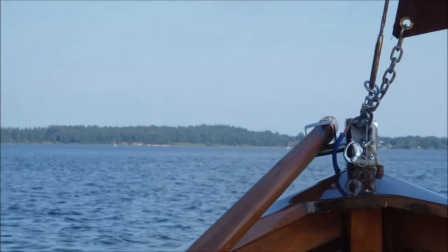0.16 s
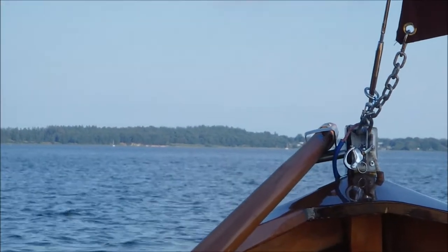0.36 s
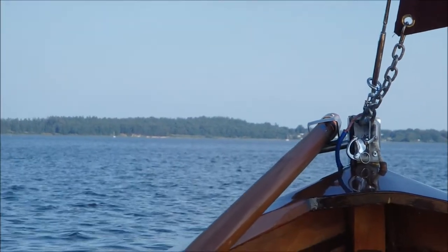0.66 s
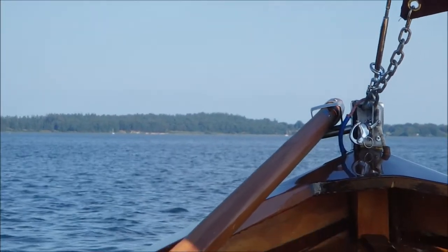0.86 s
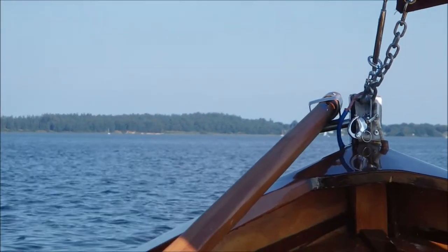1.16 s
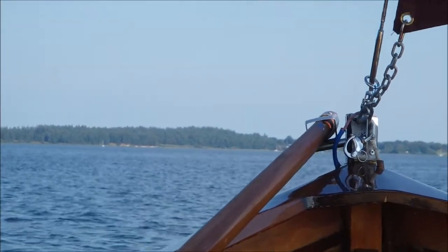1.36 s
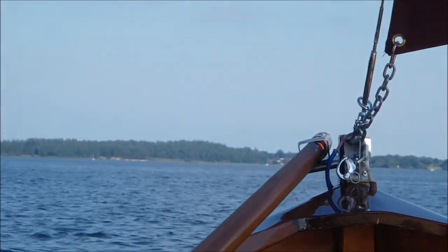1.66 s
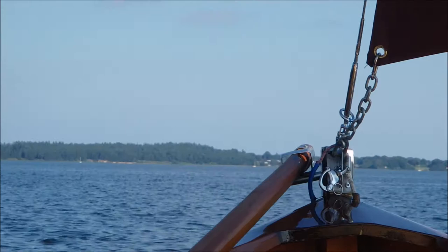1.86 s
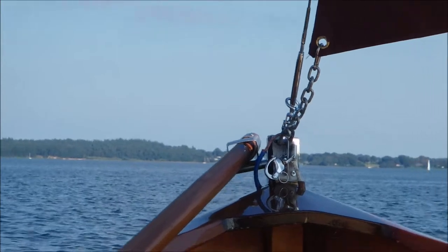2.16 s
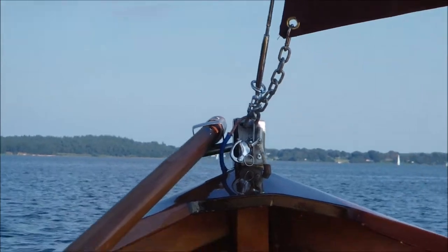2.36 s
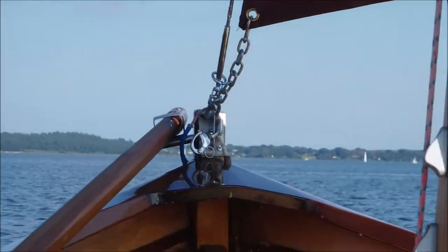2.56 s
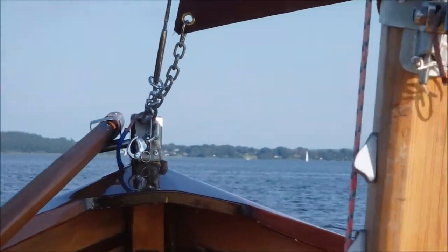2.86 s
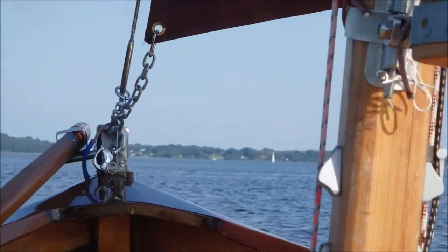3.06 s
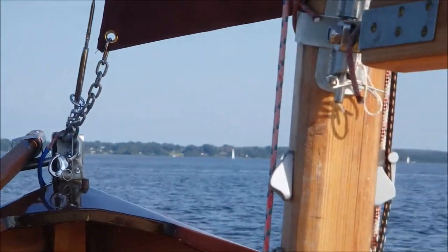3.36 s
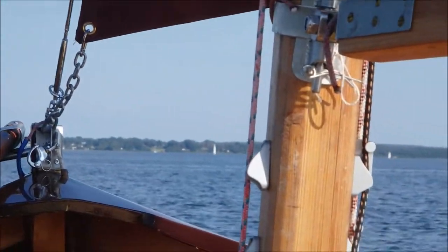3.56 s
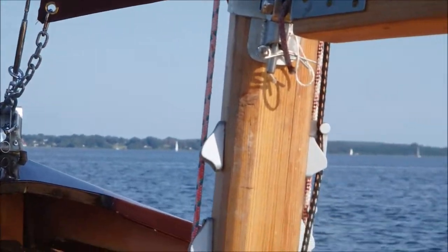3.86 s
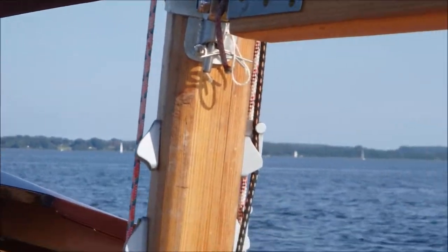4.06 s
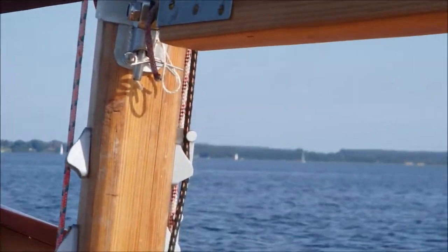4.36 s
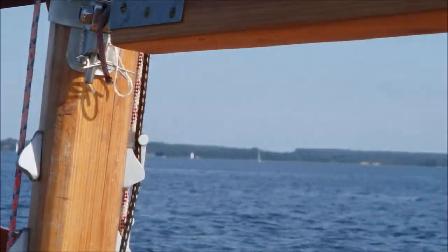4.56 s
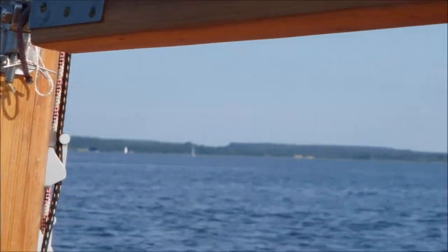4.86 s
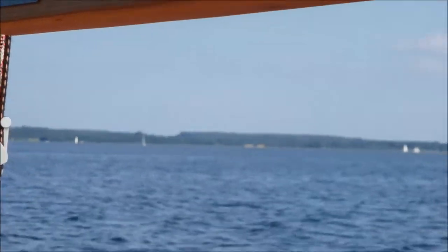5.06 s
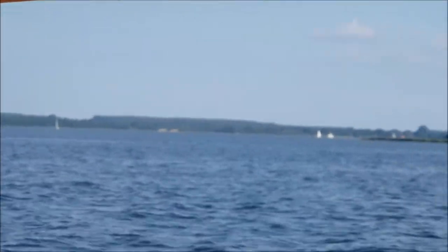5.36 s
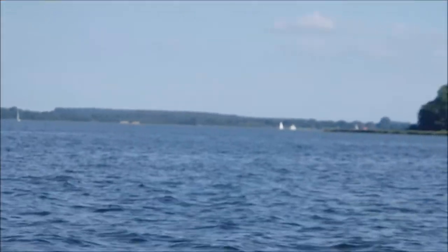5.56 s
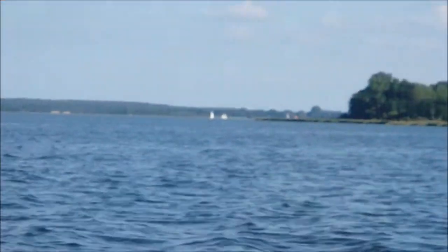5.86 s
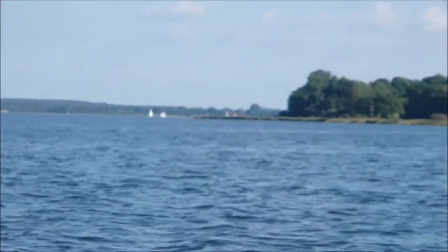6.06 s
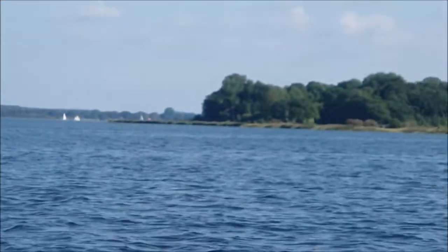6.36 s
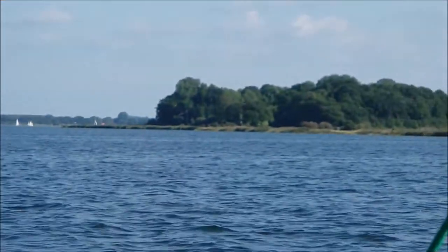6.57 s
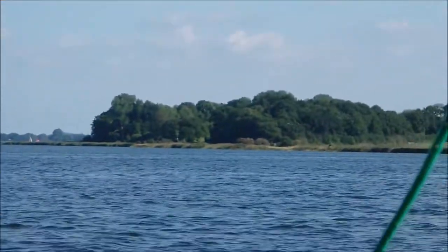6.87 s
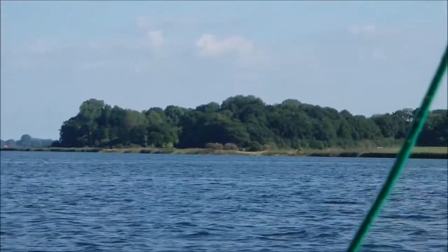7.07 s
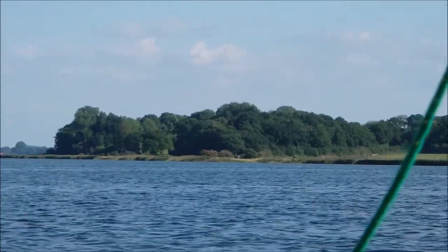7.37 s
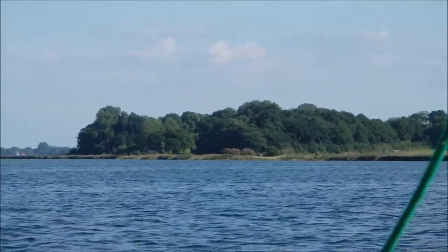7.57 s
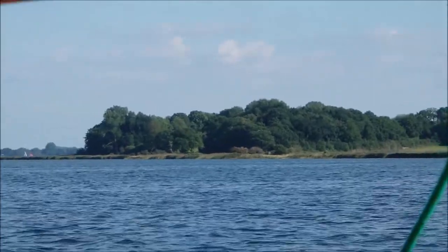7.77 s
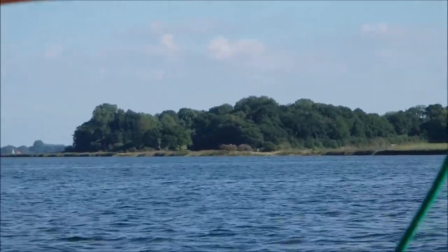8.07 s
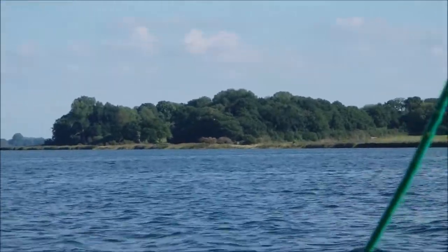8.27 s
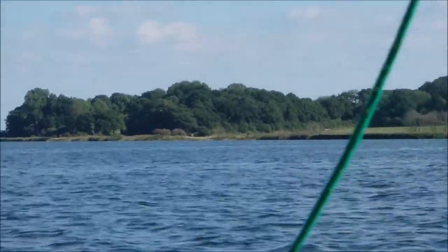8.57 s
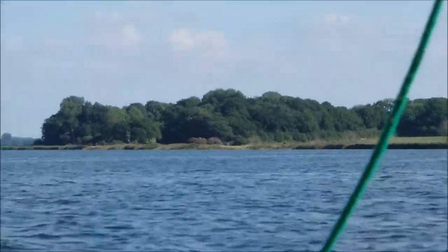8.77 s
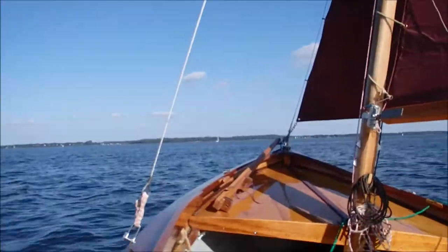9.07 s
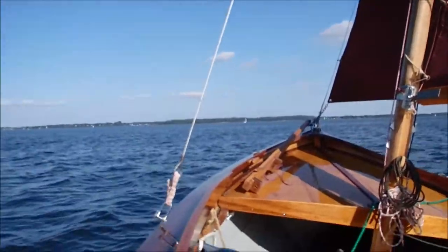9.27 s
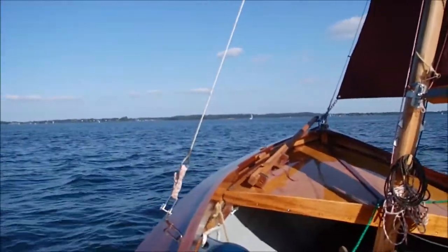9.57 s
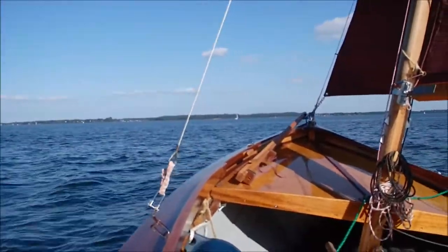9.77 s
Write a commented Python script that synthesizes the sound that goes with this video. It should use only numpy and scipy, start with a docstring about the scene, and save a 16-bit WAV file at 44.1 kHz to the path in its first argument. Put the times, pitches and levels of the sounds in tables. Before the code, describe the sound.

Water washes and fizzes along the wooden hull of a small sailing boat throughout, heard close from on board. Irregular slaps, bubbly glugs and ticking drops stand out, with the strongest splashes around 2.1, 6.5, 7.1 and 7.9 seconds. Bigger waves send dull thumps through the planks, for instance at 1.5, 4.8, 6.5, 7.9 and 9 seconds. Wind buffets the microphone with a low, uneven rumble, light at first, swelling briefly at 3.4 seconds and gusting harder from about 5.3 seconds, mostly toward the left. Between 8.3 and 8.5 seconds a finger creaks faintly on the camera casing. A sharp, loud button click at 8.8 seconds makes the level duck, and the sound drops out for an instant at 8.9 seconds. Water and wind then resume until the end at about 10 seconds.

```python
"""Wavelets slap, gurgle and thump along the wooden hull of a small sailing boat. Bubbles ring as
damped oscillators, drops strike the planks, and the churning water drives the planking's resonances.
Wind eddies buffet both microphone ports of a hand-held camera. Near the end a finger creaks on the
casing by stick-slip friction and clicks its button: the gain ducks, the sound stops for an instant,
and water and wind resume in a second shot."""
import sys
import numpy as np
from scipy import signal
from scipy.fft import rfft, irfft, next_fast_len
from scipy.io import wavfile
from scipy.ndimage import uniform_filter1d, map_coordinates

SR = 44100
rng = np.random.default_rng(int(sys.argv[2]) if len(sys.argv) > 2 else 0)


def materialize(psi):
    """Save the field psi as 16-bit PCM at rate SR to the path in sys.argv[1].

    A 1-D psi becomes a single channel; in a 2-D psi each row is a channel.
    """
    bounded = np.clip(np.atleast_2d(psi).T, -1, 1)
    quanta = np.round(bounded * 32767).astype(np.int16)
    wavfile.write(sys.argv[1], SR, quanta)


N = 437472

# Each row: time in seconds, level in dB, pitch in Hz, purity from 0 (slap) to 1 (glug).
GLUGS_AND_SLAPS = [(.112, -10, 544, 0.3), (.13, -15, 188, 0.9), (.186, -18.5, 1253, .6),
                   (0.594, -23.5, 965, 0.8), (.75, -16.5, 797, .47), (.801, -12.5, 590, 0.6),
                   (1.219, -22.5, 620, 0.64), (1.455, -17, 279, .7), (1.48, -13, 189, 0.64),
                   (1.495, -15, 652, 0.4), (2.082, -13.5, 1575, 0.35), (2.1, -14, 201, .5),
                   (2.155, -5.5, 962, 0.28), (2.294, -18.5, 1220, 0.13), (2.45, -13.5, 639, 0.61),
                   (2.69, -15.5, 717, 0.4), (2.872, -16.5, 980, 0.16), (2.926, -14, 1177, 0.38),
                   (3.022, -16, 645, 0.4), (3.121, -27, 900, 0.9), (3.151, -20, 630, 1),
                   (3.335, -15.5, 642, 0.84), (3.624, -18, 1630, 0.2), (3.82, -26, 954, 0.96),
                   (3.894, -22.5, 768, 0.8), (4.057, -16, 693, 0.84), (4.161, -24.5, 717, 0.25),
                   (4.268, -26, 1355, 0.8), (4.297, -16.5, 740, 0.76), (4.422, -14.5, 1343, 0.35),
                   (4.52, -26.5, 1000, .7), (5.028, -22.5, 1110, 1), (5.04, -19, 450, .6),
                   (5.158, -26, 1360, 0.54), (5.2, -23, 723, .7), (5.285, -21, 703, 0.6),
                   (5.58, -21, 672, 0.8), (5.859, -13.5, 424, 0.43), (5.93, -20.5, 710, 0.4),
                   (5.994, -25, 1500, 0.9), (6.415, -13, 447, 0.4), (6.51, -10, 705, 0.6),
                   (6.53, -11, 190, .5), (6.589, -7, 663, 0.35), (6.892, -23.5, 914, 1),
                   (7.002, -27, 1440, 0.8), (7.146, -8, 767, 0.36), (7.48, -18.5, 666, 0.3),
                   (7.64, -23, 630, 0.74), (7.736, -18.5, 964, 0.44), (7.818, -15.5, 938, .4),
                   (7.87, -17, 670, 0.65), (7.928, -11, 1105, 0.3), (8.411, -31, 1075, .35),
                   (8.445, -14, 936, 0.7), (8.546, -18, 490, 0.12), (8.754, -15, 1203, .26),
                   (8.947, -26, 590, 0.9), (9.015, -17.5, 488, 0.97), (9.41, -17.5, 393, 0.22),
                   (9.659, -16.5, 772, 0.43), (9.704, -11.5, 923, 0.16)]
def glugs_and_slaps(glug_t60_s=0.058, slap_t60_s=0.13):
    """Bubble resonance: a glug is one damped, rising tone; a slap is broad noise around that pitch."""
    out, t = np.zeros((2, N + SR)), np.arange(SR // 8) / SR
    for start, db, hz, purity in GLUGS_AND_SLAPS:
        t60 = purity * glug_t60_s + (1 - purity) * slap_t60_s
        envelope = amp(-60 * t / t60) * (1 - np.exp(-t / .006))
        tone = rising_tone(t, hz, climb=1.05, jitter=0.075)
        slap = band_noise(len(t), hz * 0.71, hz * 1.48)
        blend = purity * tone + 0.54 * (1 - purity) * slap
        add_at(out, start - .004, amp(db) * envelope / envelope.max() * blend)
    return out[:, :N]

# Each row: start in seconds, level in dB, centre frequency in Hz.
DROP_STRIKES = [(0.1103, -21, 2430), (.374, -17, 3570), (0.5896, -16, 2230), (0.8057, -13, 2590),
                (0.912, -21, 3080), (1.023, -19.5, 2170), (1.13, -33, 2000), (1.2504, -27, 3830),
                (1.342, -19, 3990), (1.445, -7, 2730), (1.768, -17, 9900), (1.942, -21, 3910),
                (2.084, -12.5, 2110), (2.1417, -10.5, 1760), (2.295, -23, 2500), (2.4335, -27, 4000),
                (2.6901, -13.5, 2920), (2.894, -20, 2680), (3.0826, -23, 3200), (3.146, -16.5, 2360),
                (3.517, -22, 2420), (3.5532, -18, 3650), (3.6214, -19, 1790), (3.7137, -16.5, 3180),
                (3.8584, -21.5, 2880), (4.3627, -14.5, 2910), (4.7736, -22, 3860), (4.842, -19, 3000),
                (4.8713, -19, 4050), (5.157, -17, 8500), (5.2826, -28, 1850), (5.3253, -21, 2920),
                (5.363, -13.5, 3780), (5.728, -19, 6000), (5.8045, -19, 2310), (6.0065, -11.5, 2490),
                (6.411, -14.5, 4130), (6.4907, -13.5, 3460), (6.593, -21, 3210), (6.615, -13, 2670),
                (6.6593, -28, 2420), (6.892, -29, 2020), (6.9162, -23.5, 2730), (6.944, -19.5, 4210),
                (7.0568, -16, 2320), (7.1372, -14, 1990), (7.623, -27, 3800), (7.8216, -22, 3200),
                (7.884, -20.5, 3860), (7.931, -22, 1900), (7.9886, -16, 2430), (8.284, -21, 3140)]
def drop_strikes(attack_s=0.00066, t60_s=0.057):
    """Impact excitation: drops and wave tips hit the planks, each a sudden burst with a short ring."""
    out, t = np.zeros((2, N + SR)), np.arange(SR // 8) / SR
    for start, db, hz in DROP_STRIKES:
        envelope = amp(-60 * t / t60_s) * (1 - np.exp(-t / attack_s))
        burst = band_noise(len(t), hz * 0.82, hz * 1.21)
        ring = rising_tone(t, hz, climb=1.68, jitter=0.1)
        add_at(out, start, amp(db) * envelope * (0.64 * ring + 0.68 * burst))
    return out[:, :N]

# Steady flow, one list per shot. Each row: time in seconds, gurgle level in dB, fizz level in dB.
WATER_FLOW = [
    [(0, -35, -37), (.35, -45, -38), (.6, -41, -36), (1.15, -43, -37), (1.85, -41.5, -42),
     (2.2, -36.5, -35), (2.6, -43, -32), (2.68, -51, -41.5), (2.75, -35, -30), (2.85, -37, -37),
     (3.08, -37.5, -37), (3.28, -33.5, -31.5), (3.94, -43, -41.5), (4.4, -36, -37.5), (4.6, -44.5, -43),
     (5.18, -38.5, -34.5), (6.25, -45.5, -39.5), (6.55, -34, -36), (6.87, -39, -36.5), (7.3, -35.5, -34),
     (7.77, -38, -38), (8.05, -38, -42), (8.39, -45.5, -40.5), (8.6, -44, -31), (8.74, -33, -34)],
    [(8.94, -35.5, -34), (9.3, -31.5, -31), (9.64, -36.5, -33), (9.8, -29.5, -26.5), (9.92, -30, -32)],
]
# Breaking wavelets. Each row: start and length in seconds, then gurgle, fizz and spray levels in dB.
WAVELETS = [(.115, 0.03, -31, -29.5, -31), (.17, 0.045, -31.5, -53, -47), (.378, 0.024, -60, -47, -36),
            (.504, 0.043, -31, -26, -40), (.597, 0.022, -34, -23.5, -34), (.635, .05, -24, -27.5, -37),
            (.745, 0.045, -34, -28, -52), (.805, 0.026, -19.5, -33, -50), (1.26, .05, -40, -42, -44),
            (1.31, 0.13, -34.5, -30.5, -34.5), (1.445, 0.027, -32, -26, -31.5),
            (1.49, 0.069, -27.5, -27.5, -31), (1.716, .065, -40, -39.5, -36),
            (1.93, 0.19, -34.5, -34, -32.5), (2.086, 0.037, -23, -20.5, -28),
            (2.14, 0.061, -23, -29, -26.5), (2.297, 0.023, -38, -42, -32), (2.4, 0.088, -55, -29, -23.5),
            (2.48, .1, -40, -38, -24), (2.693, 0.033, -27, -21.5, -30), (2.79, 0.035, -31, -25, -26.5),
            (2.878, 0.069, -29, -28.5, -28), (2.97, 0.046, -36, -32.5, -29), (3.128, 0.12, -28, -30.5, -36),
            (3.412, 0.038, -32.5, -38, -30), (3.54, 0.046, -59, -33.5, -45), (3.6, 0.027, -45, -31, -34),
            (3.718, 0.0064, -29.5, -27, -29), (3.85, 0.018, -34.5, -47, -45), (4.08, .06, -44, -39, -42),
            (4.16, .025, -36, -30, -44), (4.225, 0.046, -55, -29.5, -48), (4.29, 0.028, -26, -33.5, -48),
            (4.824, 0.085, -36, -30, -36), (5.03, 0.06, -26, -31.5, -33), (5.285, .15, -37, -30, -37),
            (5.537, 0.089, -36, -37.5, -47), (5.92, 0.058, -35.5, -28, -37), (6.0, 0.037, -23, -27.5, -27),
            (6.414, .025, -36.5, -42.5, -34), (6.495, 0.052, -22, -21.5, -25),
            (6.592, 0.013, -24.5, -27, -34), (6.66, 0.024, -39, -28, -33), (6.894, 0.038, -32, -43, -54),
            (7.009, 0.069, -27, -27, -29), (7.135, 0.034, -19.5, -25, -27), (7.224, 0.059, -34, -29, -33),
            (7.463, 0.064, -45, -38, -42), (7.583, 0.086, -34, -54, -48), (7.815, 0.029, -32, -28, -30),
            (7.873, 0.027, -22, -27, -23.5), (7.932, 0.042, -29, -30, -30), (8.102, 0.067, -38, -34, -35.5),
            (8.41, .02, -32.5, -34, -38), (8.445, 0.025, -23, -33.5, -25), (8.55, 0.057, -32.5, -36, -34),
            (8.98, 0.18, -33, -33, -37), (9.3, 0.039, -35, -28.5, -31), (9.705, 0.049, -24.5, -28.5, -35)]
# Filters for three bands of churning water. Each row: frequency in Hz, relative gain in dB.
GURGLE_BAND = [(60, -97), (200, -25), (400, -2), (650, -2), (1000, -2.5), (1500, -7), (2500, -9.5),
               (6000, -100)]
FIZZ_BAND = [(200, -100), (600, -48), (1200, 3), (1800, 1), (3000, 4.5), (4500, -0.5), (6000, -1.5),
             (9000, -27), (15000, -100)]
SPRAY_BAND = [(1000, -100), (3000, -28), (5300, -1.5), (7000, -8), (9000, -0.5), (11000, -6), (13000, -19),
              (16000, -53)]
def wash(smooth_db=-24.5):
    """Incoherent addition: flow and wavelets sum in power; the smaller bubbles ring at higher pitch."""
    gurgle_db, fizz_db = curves(np.concatenate(WATER_FLOW))
    flow = amp([gurgle_db, fizz_db, fizz_db - 2.5])
    gurgle_gain, fizz_gain, spray_gain = np.hypot(flow, swells(WAVELETS, rise_s=.005, fall_s=0.019))
    # Strong water runs smooth; single ripples stand out as the fizz sinks below smooth_db.
    choppiness = np.clip(0.04 * (smooth_db - 20 * np.log10(fizz_gain)), 0, 2)
    surge = choppiness * ripples(per_s=35, fade_s=0.025)
    gurgle = 1.4 * churn(depth_db=4.5)
    gurgle += 0.35 * bubbles(3500, 900, centre_hz=860, octaves=0.695, cycles=8.9, rise=0.098)
    fizz = 1.75 * churn(depth_db=3)
    fizz += 0.6 * bubbles(8000, 300, centre_hz=2693, octaves=0.59, cycles=17.6, rise=0.11)
    spray = 1.6 * churn(depth_db=4)
    spray += .5 * bubbles(9000, 100, centre_hz=7500, octaves=.5, cycles=3, rise=0.063, spread_db=5.5)
    drumming = gurgle_gain * amp(-3 + 3 * surge) * planking(churn(depth_db=3))
    low = gurgle_gain * amp(1.64 * surge + 0.27 * wobble(25)) * coloured(gurgle, GURGLE_BAND)
    middle = fizz_gain * amp(2.1 * surge + 1.53 * wobble(35)) * coloured(fizz, FIZZ_BAND)
    high = spray_gain * amp(2.96 * surge) * coloured(spray, SPRAY_BAND)
    return drumming + low + middle + high

def bubbles(count, samples, centre_hz, octaves, cycles, rise, spread_db=3.5):
    """Damped oscillation: random bubbles ring on either side, climbing in pitch as they surface."""
    onset, strength, side, persistence = rng.random((count, 4)).T[:, :, None]
    hz = np.clip(centre_hz * 2 ** (octaves * rng.standard_normal((count, 1))), 100, 15000)
    turns = hz * np.arange(samples) / SR
    age = turns / (cycles * (.5 + persistence))
    gain = amp(spread_db * np.minimum(-np.log(1 - strength), 3.5))
    rings = gain * np.sin(2 * np.pi * turns * (1 + rise * age / 2)) * age * np.exp(-4 * age)
    index = (onset * N).astype(int) + np.arange(samples) + (side < .5) * (N + samples)
    cloud = np.bincount(index.ravel(), rings.ravel(), 2 * (N + samples))
    return unit(cloud.reshape(2, -1)[:, :N])

def churn(depth_db):
    """Random modulation: two noises share loud and quiet patches in time and frequency."""
    spectra = signal.stft(rng.standard_normal((2, N)), nperseg=256)[2]
    patches = uniform_filter1d(rng.standard_normal(spectra.shape[1:]), size=4, axis=0)
    patches = unit(uniform_filter1d(patches, size=7, axis=1))
    return unit(signal.istft(spectra * amp(depth_db * patches), nperseg=256)[1][:, :N])

def ripples(per_s, fade_s):
    """Poisson arrivals: each ripple lifts the level at once, then it relaxes exponentially."""
    hits = (rng.random(N) < per_s / SR) * rng.uniform(0.24, 1, N)
    decays = signal.lfilter([1], [1, -np.exp(-1 / (fade_s * SR))], hits)
    level = uniform_filter1d(decays, size=60)
    return unit(level - level.mean())

# Each row: resonant frequency in Hz, bandwidth in Hz, relative level in dB.
PLANK_MODES = [(198, 38, 0), (309, 133, 0.5), (456, 180, -10.5), (680, 270, -8)]
def planking(water):
    """Modal superposition: water drives the resonances of the planks, summed with alternating sign."""
    def response(hz):
        return sum((-1) ** k * amp(db) * resonance(hz, centre, width)
                   for k, (centre, width, db) in enumerate(PLANK_MODES))
    return unit(filtered(water, response))

# Each row: start in seconds, length in seconds, rumble level in dB, deep push level in dB.
HULL_THUMPS = [(.12, 0.052, -26, -43), (.39, 0.027, -34, -26), (.6, .076, -36.5, -35),
               (.79, 0.065, -29.5, -49), (1.45, 0.045, -29, -25), (2.1, .13, -27, -29),
               (2.3, 0.023, -32, -29), (2.7, .077, -34, -42), (3.2, 0.088, -31, -38),
               (4.79, 0.052, -29, -25), (6.47, 0.098, -24, -30), (7.87, 0.045, -23.5, -24),
               (9.01, 0.044, -19, -22.5), (9.66, 0.15, -35, -26)]
def hull_thumps():
    """Structure-borne sound: larger waves come through the boat as a rumble over a deeper push."""
    rumble_gain, push_gain = swells(HULL_THUMPS, rise_s=0.014, fall_s=0.04)
    rumble = rumble_gain * turbulence(RUMBLE_BAND, bias=0.88, drift_hz=8)
    push = push_gain * turbulence(DEEP_BAND, bias=-0.082, drift_hz=8)
    return rumble + push

# Filters for slow and small eddies, shared by the thumps. Each row: frequency in Hz, relative gain in dB.
DEEP_BAND = [(5, -93), (20, -11), (50, 0.5), (110, -1.5), (160, -7.5), (300, -63), (900, -120)]
RUMBLE_BAND = [(20, -91), (60, -25), (120, -1), (190, 0.5), (290, -7.5), (380, -13.5), (500, -29),
               (800, -42), (2000, -120)]
# One list per shot. Each row: time in seconds, then slow eddies, small eddies and left minus right in dB.
WIND_LEVELS = [
    [(0, -34.5, -34, 3.5), (.66, -32.5, -37.5, 1.5), (1.05, -41.5, -49.5, -0.5), (1.55, -31, -40, -1.5),
     (1.8, -37, -45, -0.5), (2.14, -38, -42, -1), (2.51, -39, -46.5, -0.5), (3.41, -29.5, -25.5, 4.5),
     (3.75, -30.5, -30, 4), (4.1, -39, -42.5, 0.5), (4.5, -34.5, -35, 4), (4.87, -31, -33, 2),
     (5.4, -26, -30.5, 3), (5.75, -29.5, -32, 4), (6.4, -28.5, -28, 2.5), (7.1, -23, -23, 4),
     (7.6, -23.5, -26.5, 3.5), (8.1, -27.5, -30.5, 4), (8.45, -23, -34, 3.5), (8.62, -37, -28.5, -4),
     (8.74, -28, -39.5, -1)],
    [(8.94, -24, -25, 7), (9.35, -29, -33, -1), (9.56, -30.5, -36.5, -1), (9.66, -22.5, -32, -6),
     (9.92, -28.5, -28, 2)],
]
# Each row: start in seconds, length in seconds, level in dB.
WIND_PUFFS = [(1.23, 0.053, -30), (2.93, .03, -27.5), (5.29, .07, -25.5), (5.66, 0.043, -20),
              (5.84, .04, -24.5), (6.14, .04, -21.5), (6.29, 0.033, -22), (6.66, 0.034, -23),
              (6.81, 0.067, -23), (7.76, .04, -22.5), (8.04, .05, -19.5), (8.18, 0.079, -24.5),
              (8.28, 0.064, -21.5), (8.47, 0.027, -18.5), (8.96, .04, -29), (9.39, 0.044, -21),
              (9.6, 0.027, -20)]
def wind():
    """Turbulent pressure fluctuation: slow and small eddies push on the ports in uneven gusts."""
    slow_db, small_db, balance_db = curves(np.concatenate(WIND_LEVELS))
    gust_db = 0.95 * wobble(13)
    def gusting(depth_db, rate_hz):
        return amp(gust_db + depth_db * np.array([wobble(rate_hz), wobble(rate_hz)]))
    slow = unit(gusting(0.5, 13) * turbulence(DEEP_BAND, bias=0.021, drift_hz=6.3))
    small = unit(gusting(3.5, 27) * turbulence(RUMBLE_BAND, bias=0.73, drift_hz=9))
    puffs, = swells(WIND_PUFFS, rise_s=.012, fall_s=0.01)
    pressure = np.hypot(amp(slow_db), puffs) * slow + amp(small_db) * small
    return balance(balance_db + 3.2 * wobble(9)) * pressure

def turbulence(spectrum, bias, drift_hz):
    """Partial correlation: pressures at the two ports drift between alike, unrelated and opposed."""
    left, independent = coloured(rng.standard_normal((2, N)), spectrum)
    correlation = np.tanh(bias + 0.71 * wobble(drift_hz))
    right = correlation * left + np.sqrt(1 - correlation ** 2) * independent
    return np.array([left, right])

# Each row: start in seconds, length in seconds, level in dB.
FINGER_RUBS = [(8.265, 0.027, -35), (8.36, 0.04, -35), (8.42, 0.045, -28), (8.507, 0.018, -20)]
def finger_creak():
    """Stick-slip friction: skin jerks over the casing and excites two resonances, louder on the left."""
    envelope, = swells(FINGER_RUBS, rise_s=0.012, fall_s=0.0079)
    slips = amp(2 * wobble(100)) * rng.standard_normal((2, N))
    squeak = unit(filtered(slips, lambda hz: resonance(hz, centre_hz=3600, width_hz=600) ** 3))
    rasp = unit(filtered(slips, lambda hz: resonance(hz, centre_hz=7000, width_hz=3000) ** 3))
    return balance(6) * envelope * (squeak + amp(-17) * rasp)

# Each row: start in seconds, level in dB, left minus right in dB.
CASING_CLICKS = [(8.7702, 5, -5), (8.4806, -27, 3), (9.067, -17, 0)]
# Each row: frequency in Hz, relative level in dB, time to decay by 60 dB in seconds.
CASING_MODES = [(3000, -4, .007), (4100, 0, .007), (5800, -11, .005), (8000, -19, .003), (10800, -19, .003),
                (13800, -22, .003)]
def casing_clicks():
    """Impulse response: each click sets the heavily damped modes of the casing ringing."""
    out, t = np.zeros((2, N)), np.arange(400) / SR
    for start, db, balance_db in CASING_CLICKS:
        for hz, mode_db, t60 in CASING_MODES:
            envelope = amp(db + mode_db + rng.normal(0, 0.54, (2, 1)) - 60 * t / t60)
            tone = np.sin(2 * np.pi * (hz * t + rng.normal(0, 0.14, (2, 1))))
            add_at(out, start, balance(balance_db) * envelope * tone)
    return out

# Both ports fall off above their resonance, the right further. Each row: frequency in Hz, gain in dB.
LEFT_PORT = [(500, -3), (2500, -3), (3300, -0.5), (3900, 5.5), (4400, -2.5), (4900, -17.5), (5300, -10),
             (6200, -15), (8000, -19)]
RIGHT_PORT = [(500, -3), (2500, -1.5), (3500, -1), (3900, -2), (4400, -2), (4900, -20.5), (5300, -23),
              (8000, -30)]
# Each row: frequency in Hz, phase lead of the left port in radians.
PORT_LEAD = [(300, 0), (1000, .12), (1900, .35), (3350, 1.55), (4200, .85), (4800, 2.6), (5300, 0)]
# Each row: frequency in Hz, coherence of the two ports from 0 to 1.
PORT_COHERENCE = [(300, 1), (800, 0.99), (2000, 0.98), (3200, 1), (3600, 0.49), (4300, 0.7), (5200, 0.49)]
def ports(pair):
    """Spatial coherence: two close ports hear nearly alike, each with its own colour and phase."""
    def mid_side_gains(hz):
        angle = np.arccos(along(PORT_COHERENCE, hz)) / 2
        return np.array([np.cos(angle), np.sin(angle)])
    def response(hz):
        gains = amp([along(LEFT_PORT, hz), along(RIGHT_PORT, hz)])
        return gains * np.exp([[.5j], [-.5j]] * along(PORT_LEAD, hz))
    mid, side = filtered(pair, mid_side_gains)
    return filtered(np.array([mid + side, mid - side]), response)

# Each row: frequency in Hz, relative gain in dB.
HISS_BAND = [(100, 4.5), (3000, 0.5), (7000, -1), (11000, -1.5), (14500, 0.5), (15300, -2), (15800, -21)]
def preamp_hiss():
    """Electronic noise: a faint, steady floor, independent in each channel."""
    return amp(-50) * coloured(rng.standard_normal((2, N)), HISS_BAND)

def gain_control(x, recovery_db_per_s=14, lag_samples=60):
    """Peak limiting: the gain drops just after a peak passes full scale and recovers slowly."""
    needed_db = np.minimum(0, -20 * np.log10(np.abs(x).max(axis=0) + 1e-9))
    recovery_db = recovery_db_per_s * np.arange(x.shape[1]) / SR
    gain_db = np.minimum.accumulate(needed_db - recovery_db) + recovery_db
    delayed_db = np.pad(gain_db, (lag_samples, 0))[:len(gain_db)]
    return x * amp(uniform_filter1d(delayed_db, size=41))

def swells(rows, rise_s, fall_s):
    """Power summation of events, one gain per level column; rise_s and fall_s are times per 10 dB."""
    starts, lengths, *levels = np.transpose(rows)
    power, t = np.zeros((len(levels), N + SR)), np.arange(SR // 2) / SR - .1
    for start, hold, db in zip(starts, lengths, np.transpose(levels)):
        shape_db = 10 * np.minimum(0, np.minimum(t / rise_s, (hold - t) / fall_s))
        add_at(power, start, amp(db[:, None] + shape_db) ** 2)
    return np.sqrt(power[:, SR // 10:][:, :N])

def rising_tone(t, hz, climb, jitter):
    """A linear chirp whose phase takes a random walk in each channel."""
    drift = jitter * np.cumsum(rng.standard_normal((2, len(t))), axis=1)
    return np.sin(2 * np.pi * hz * t * (1 + climb * t) + drift)

def band_noise(samples, low_hz, high_hz):
    """Two channels of band-pass noise at rms 1."""
    band = signal.butter(1, [low_hz, high_hz], "bandpass", fs=SR)
    return unit(signal.lfilter(*band, rng.standard_normal((2, samples))))

def resonance(hz, centre_hz, width_hz):
    """Frequency response of a damped oscillator, 1 at its centre."""
    damping = 1j * hz * width_hz
    return damping / (centre_hz ** 2 - hz ** 2 + damping)

def filtered(x, response):
    """Linear filtering: the spectrum of x times a complex frequency response."""
    size = next_fast_len(N + SR // 2)
    return irfft(rfft(x, size) * response(np.fft.rfftfreq(size, 1 / SR)), size)[..., :N]

def coloured(x, spectrum):
    """Spectral shaping by (Hz, dB) points, at rms 1."""
    return unit(filtered(x, lambda hz: amp(along(spectrum, hz))))

def wobble(rate_hz):
    """A smooth random curve with rate_hz knots a second."""
    knots = rng.standard_normal(int(N * rate_hz / SR) + 4)
    return map_coordinates(knots, [np.arange(N) * rate_hz / SR])

def curves(rows):
    """Linear interpolation in time of each column after the first."""
    times, *columns = np.transpose(rows)
    return [np.interp(np.arange(N) / SR, times, column) for column in columns]

def along(points, hz):
    """Interpolation of (Hz, value) points on a logarithmic frequency axis."""
    knots_hz, values = np.transpose(points)
    return np.interp(np.log(hz + 1), np.log(knots_hz + 1), values)

def add_at(out, start_s, event):
    """Superposition of an event onto out."""
    out[:, round(start_s * SR):][:, :event.shape[1]] += event

def balance(db):
    """Left and right gains for a level difference in dB."""
    return amp(np.array([[.5], [-.5]]) * db)

def amp(db):
    """Amplitude ratio of a level in dB."""
    return 10 ** (np.asarray(db) / 20)

def unit(x):
    """Normalisation to rms 1."""
    return x / np.sqrt(np.mean(x ** 2) + 1e-20)

def scene():
    """Superposition: airborne water sound enters the ports; the rest acts on the camera itself."""
    water = wash() + glugs_and_slaps() + drop_strikes()
    return ports(water) + hull_thumps() + wind() + finger_creak() + casing_clicks()

def record(dry, pause_s=(8.879, 8.942), top_hz=15850):
    """Signal chain: hiss, gain control for each shot with silence between, clipping, a band limit."""
    x = dry + preamp_hiss()
    stop, restart = (round(s * SR) for s in pause_s)
    out = np.zeros_like(x)
    out[:, :stop] = gain_control(x[:, :stop])
    out[:, restart:] = gain_control(x[:, restart:])
    clipped = np.clip(out, -.95, .95)
    return filtered(clipped, lambda hz: np.clip((top_hz - hz) / 300, 0, 1))

dry = scene()
out = record(dry)
materialize(out)
```